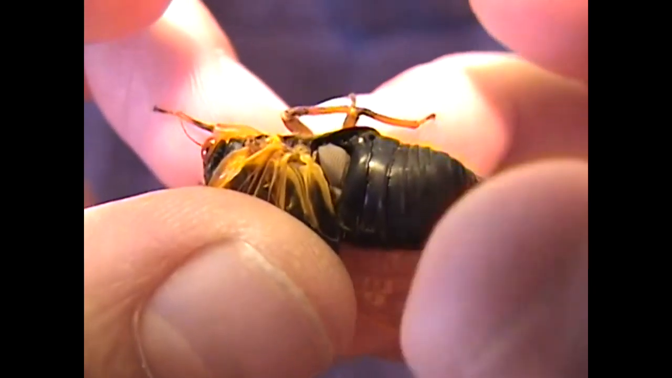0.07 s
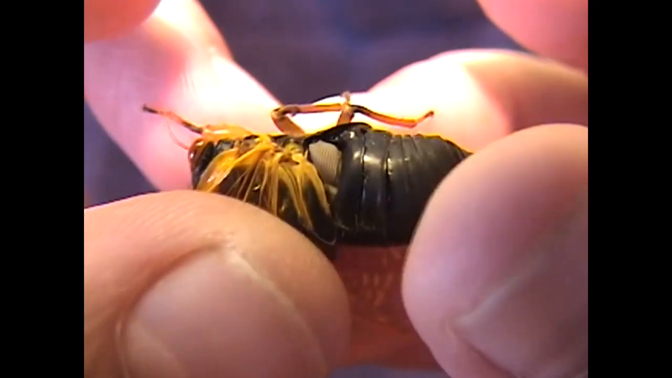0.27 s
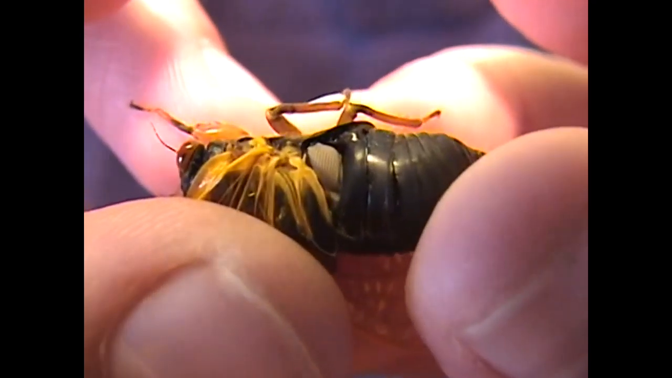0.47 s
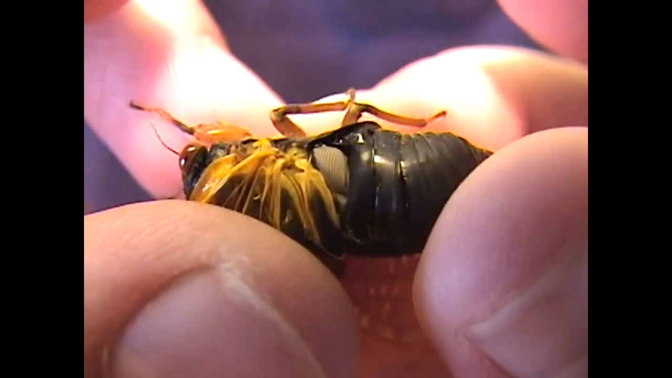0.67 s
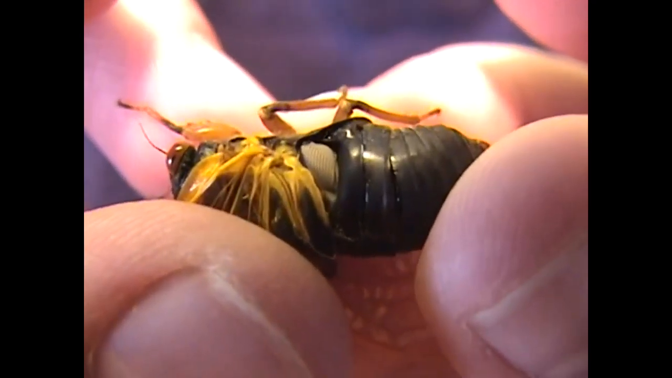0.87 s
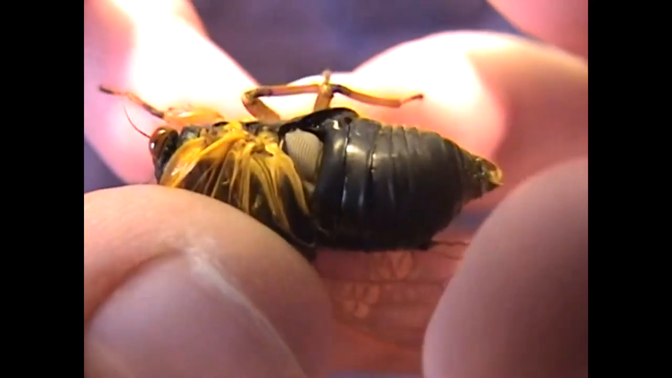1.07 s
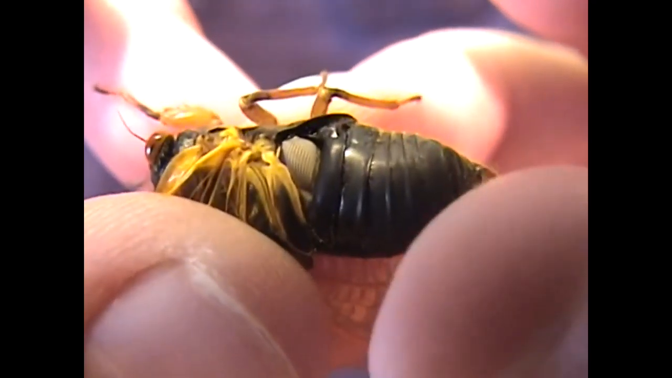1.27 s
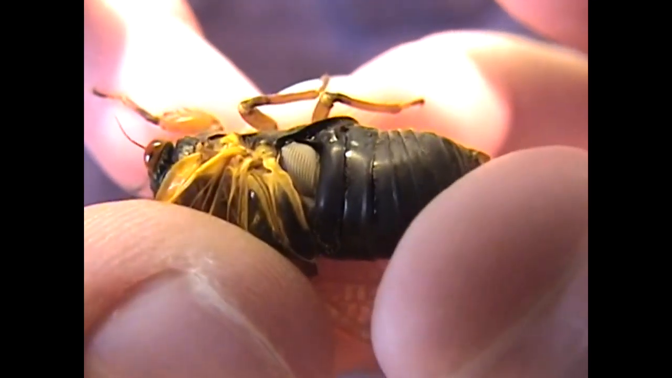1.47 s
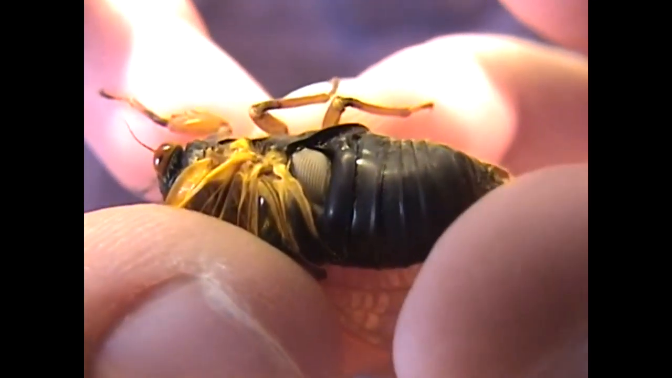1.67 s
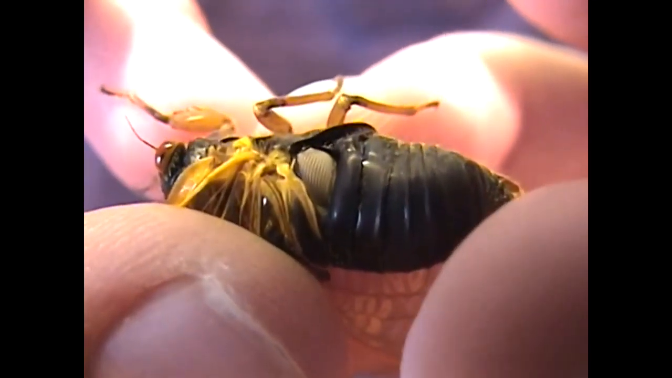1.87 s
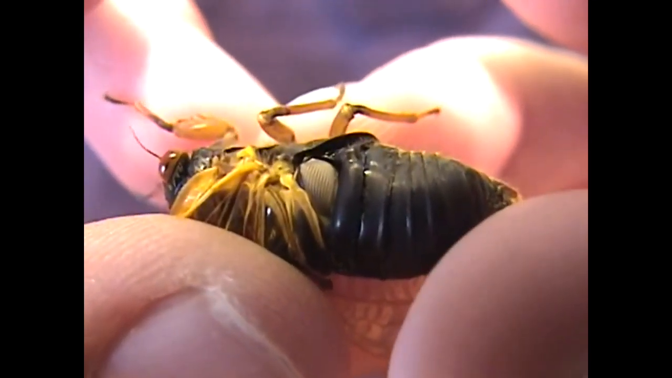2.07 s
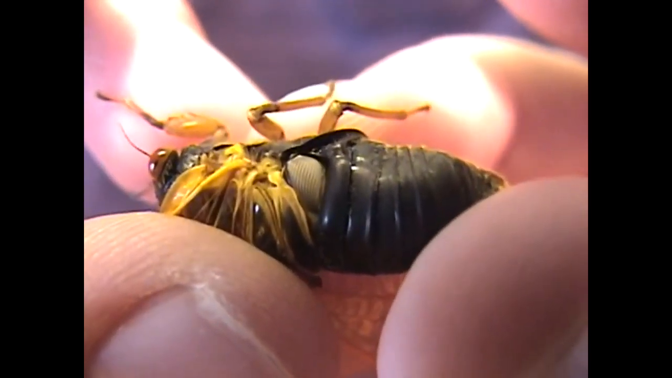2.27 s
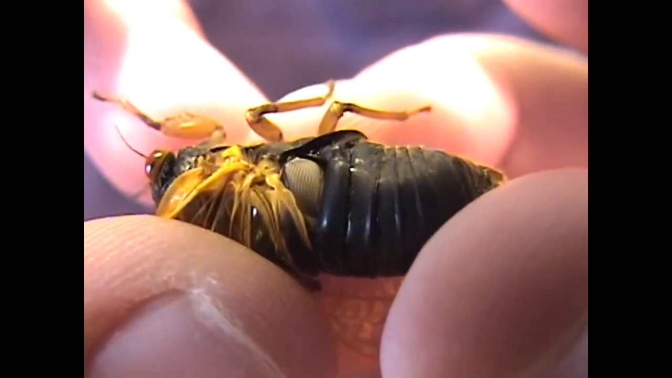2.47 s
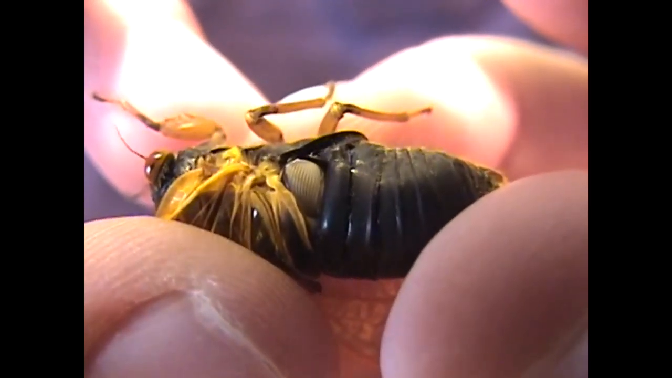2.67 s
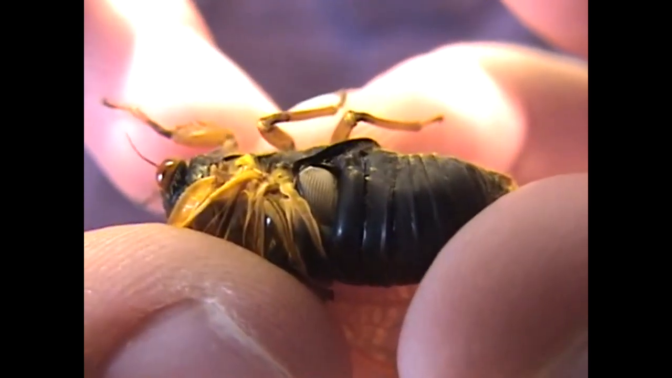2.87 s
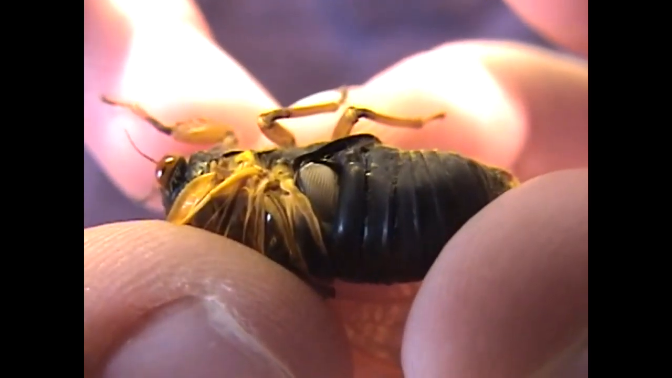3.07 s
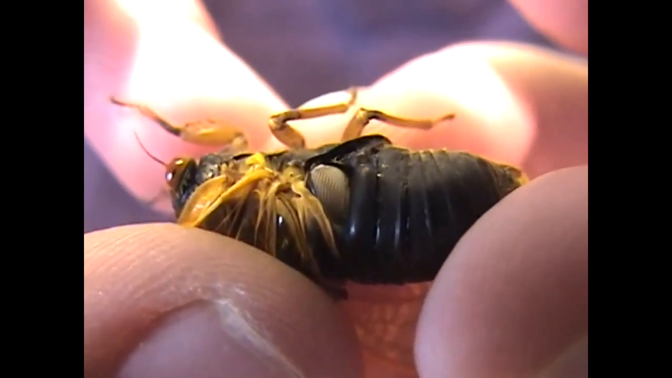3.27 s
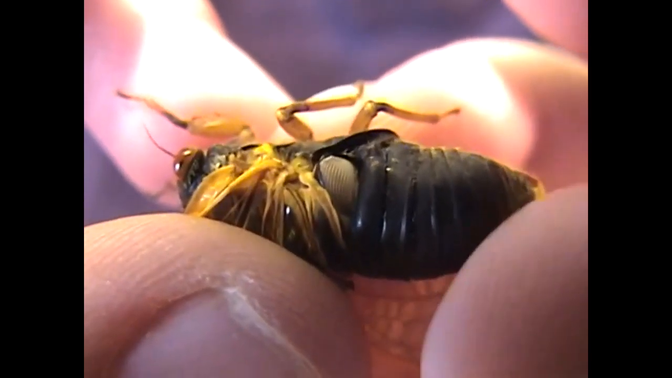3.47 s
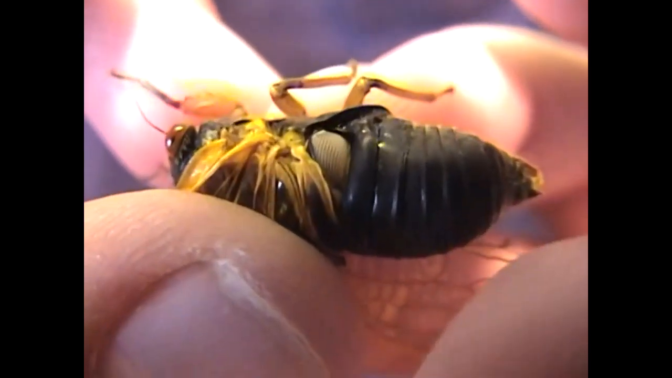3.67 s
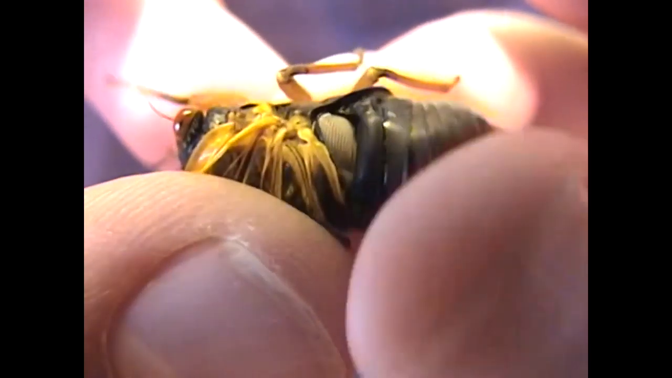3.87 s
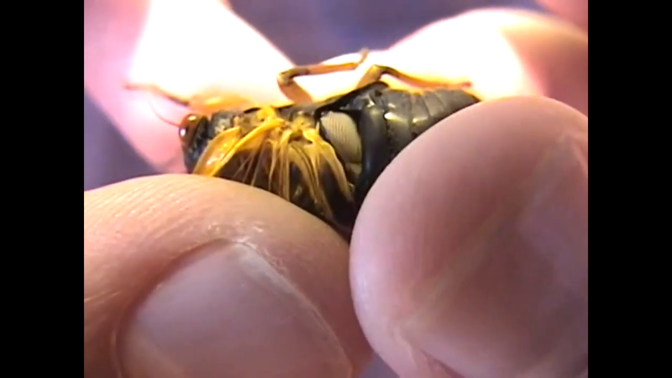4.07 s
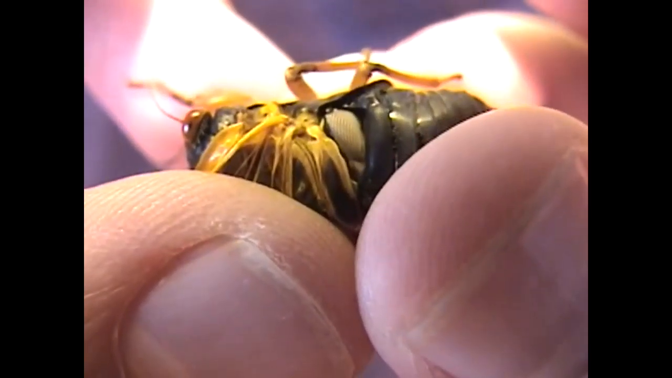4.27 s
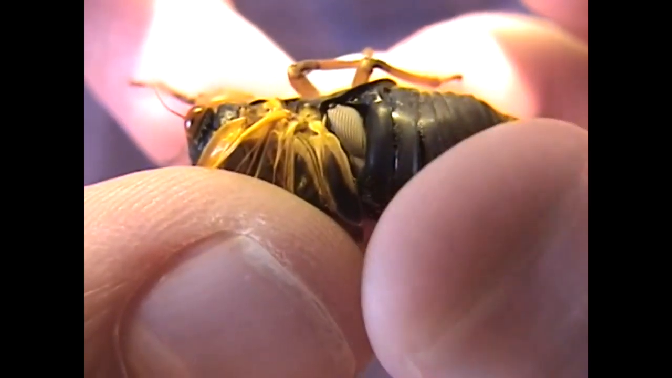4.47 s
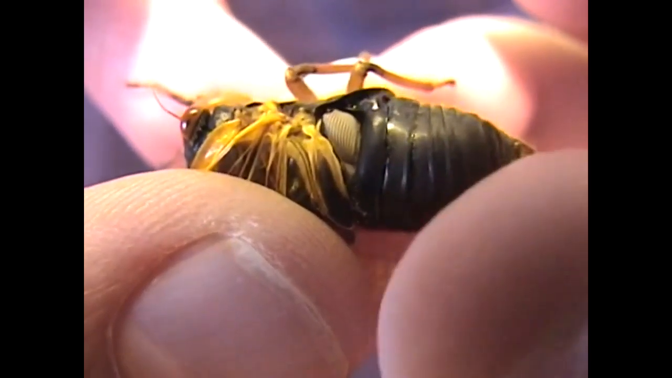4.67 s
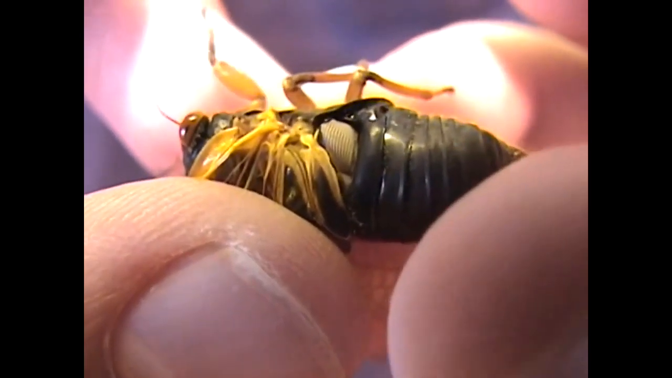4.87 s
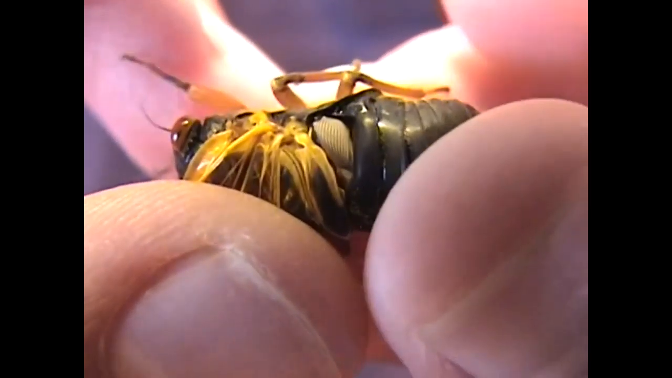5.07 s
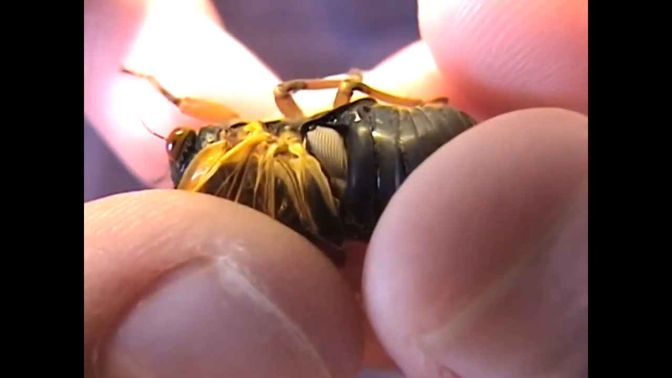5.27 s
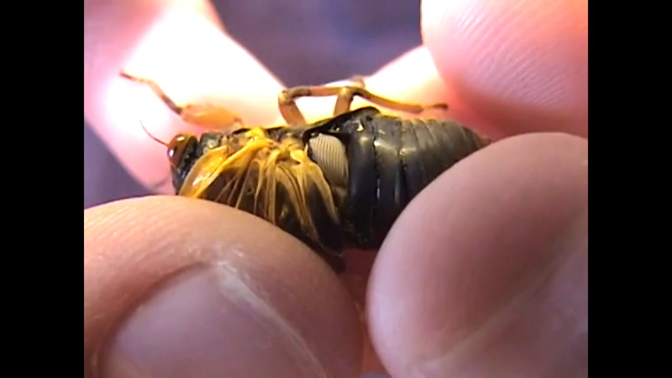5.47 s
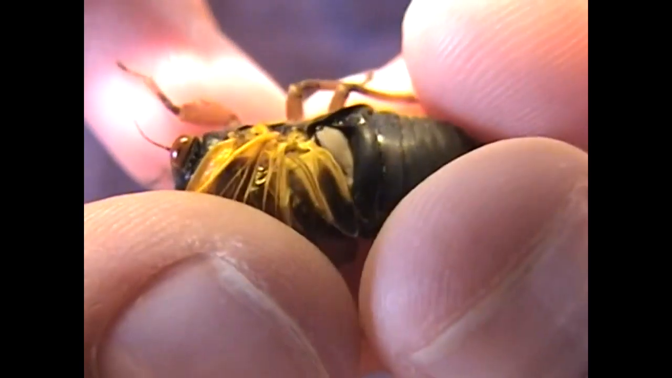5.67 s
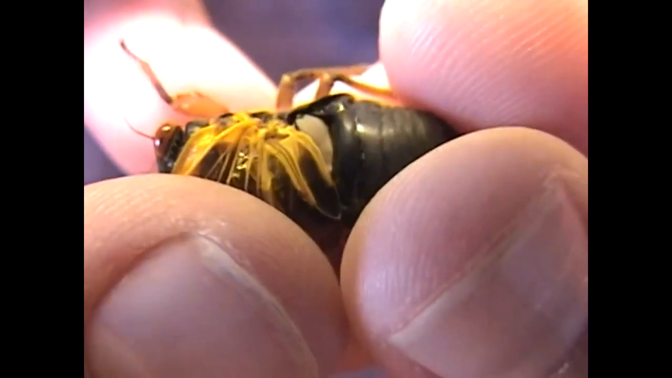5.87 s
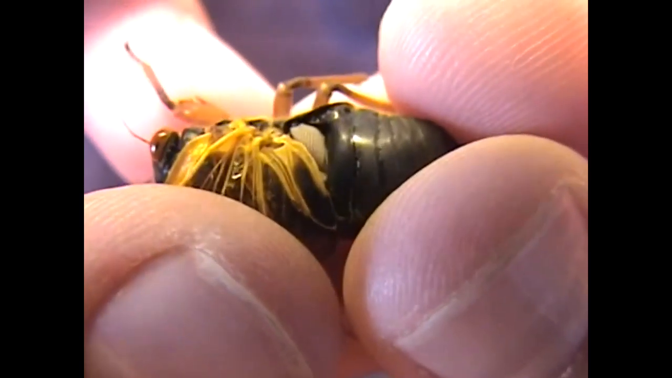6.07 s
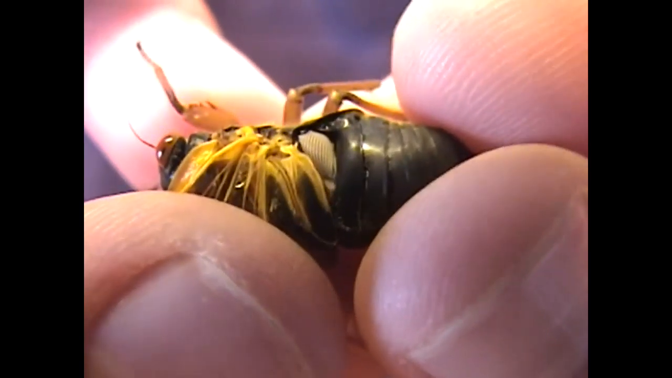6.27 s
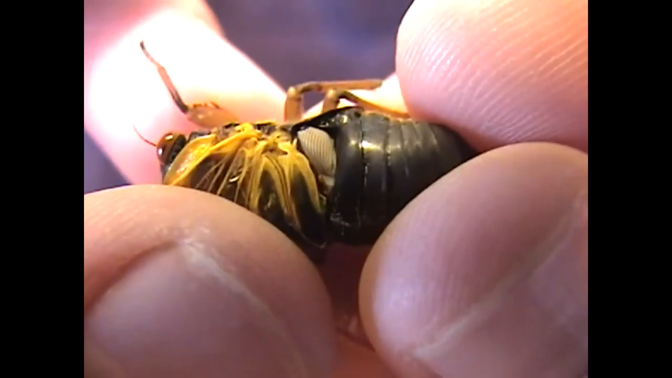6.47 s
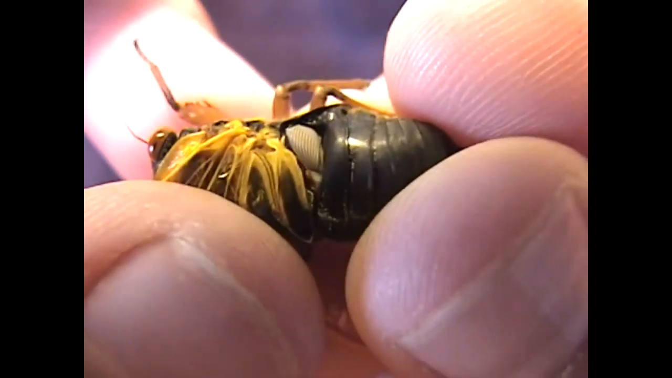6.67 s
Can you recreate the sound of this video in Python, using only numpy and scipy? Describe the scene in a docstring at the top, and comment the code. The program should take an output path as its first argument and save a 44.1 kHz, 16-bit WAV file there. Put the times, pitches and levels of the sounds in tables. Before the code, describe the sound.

Outdoors, a steady airy hiss of distant insects, bright around five to six kilohertz, sits slightly left over a quiet low drone and faint air hum. A cicada held in fingers is very close to the stereo microphone. A small tick opens, and a tiny two-pulse buzz comes at 0.44 s. A sharper double leg tick falls at 0.78 s, with fainter ticks and barely audible far whistles up to about 2.3 s. The hiss swells from 3.7 s. At 3.86 s the cicada bursts into harsh, dry, rapid rattling, about 170 pulses per second, broken into shortening pieces until 4.24 s. Brief rasps come at 4.94, 4.98 and 5.06 s. From 5.53 to 6.02 s a longer stuttering buzz runs with tiny gaps, then short chirrs at 6.21 and 6.4 s. Onsets snap, with slight low thumps; the hiss continues to the end at 6.7 s.

```python
"""Outdoors among trees, a cicada held between fingers close to a stereo microphone gives short alarm buzzes.
Its two ribbed membranes buckle in turn, rib after rib; each rib rings, drives the air sac and knocks the body.
Behind it, shaped noise makes a low drone and a high hiss of far choruses, over outdoor air and a faint hum.
Gliding near sines make a few far whistles, and short noise puffs make the ticks of legs and wings.
The recorder's gain control ducks loud sound and thumps at loud starts."""
import sys
import numpy as np
from scipy import signal
from scipy.fft import rfft, irfft, next_fast_len
from scipy.io import wavfile
from scipy.ndimage import uniform_filter1d, minimum_filter1d

SR = 44100
rng = np.random.default_rng(int(sys.argv[2]) if len(sys.argv) > 2 else 0)


def store_pcm(level_fs):
    """Save levels as 16-bit WAV."""
    pcm = np.round(np.clip(level_fs, -1, 1) * 32767).astype(np.int16)
    wavfile.write(sys.argv[1], SR, np.atleast_2d(pcm).T)


N = 297234      # length in samples


def from_db(db):
    """Turn decibels into a plain multiplier."""
    return 10 ** (np.asarray(db) / 20)


def rms_one(x):
    """Scale a signal to an average (rms) strength of 1."""
    return x / np.sqrt(np.mean(x ** 2) + 1e-20)


def sides(pan_db):
    """Left and right gains for a left-minus-right level difference."""
    return from_db(np.array([pan_db / 2, -pan_db / 2]))


def drift(rate_hz):
    """Slow random wander with an rms of about 1: smoothed noise made at every 40th sample, then joined up."""
    r = np.exp(-80 * np.pi * rate_hz / SR)
    raw = rng.standard_normal(N // 40 + 2002)
    slow = signal.lfilter([1], [1, -2 * r, r * r], raw)[2000:]      # drop the filter's start-up
    return np.interp(np.arange(N) / 40, np.arange(len(slow)), rms_one(slow))


def resonance(x, hz, width_hz):
    """Ring like a bell at one pitch: a two-pole peak with gain about 1 on top."""
    r = np.exp(-np.pi * width_hz / SR)
    feedback = [1, -2 * r * np.cos(2 * np.pi * hz / SR), r * r]
    return signal.lfilter([(1 - r * r) / 2, 0, (r * r - 1) / 2], feedback, x)


def band(x, low_hz, high_hz, order=2):
    """Keep only the sound between two frequencies."""
    return signal.sosfilt(signal.butter(order, [low_hz, high_hz], "band", fs=SR, output="sos"), x)


def noise(spectrum, alike, flicker_db):
    """Stereo noise of a given spectrum and left-right likeness; rms 1 in the mean of the sides, then flickering."""
    hz, level_db = np.transpose(spectrum)
    size = next_fast_len(N)
    grid = np.arange(size // 2 + 1) * SR / size + 1
    shape = from_db(np.interp(np.log(grid), np.log(hz), level_db, left=-90, right=-90))
    mid, side = irfft(rfft(rng.standard_normal((2, size))) * shape, size)[:, :N]
    alike = np.clip(alike, 0, 1)
    both = np.sqrt(1 + alike) * mid + np.sqrt(1 - alike) * side * [[1], [-1]]
    return both / np.std(both.mean(axis=0)) * from_db(flicker_db * drift(15.3))


# colour of the low outdoor air noise: f/Hz, relative level per Hz/dB
AIR_COLOUR = [(15, -42), (25, -6.5), (172, 0), (210, -6), (234, -0.5), (295, -6), (361, -3), (415, -6),
              (734, -7), (1000, -3.5), (1300, -54), (2200, -120)]
# faint low hum: f/Hz, width/Hz, level/dB
HUM_TONES = [(227, 4.5, -70), (270.3, 21, -65.5)]
AIR_DB, MIDS_DB = -57, -59


def outdoor_air():
    """Low air noise, smooth noise between the choruses, and a hum of noise rung by narrow resonances."""
    air = from_db(AIR_DB) * noise(AIR_COLOUR, alike=0.46, flicker_db=0.77)
    mids_colour = [(900, -24.0), (1800, -8.0), (3200, -2.5)]      # f/Hz, relative level per Hz/dB
    mids = from_db(MIDS_DB) * noise(mids_colour, alike=0.76, flicker_db=2.0)
    hum = 0
    for hz, width_hz, level_db in HUM_TONES:
        hum = hum + from_db(level_db) * rms_one(resonance(rng.standard_normal(N), hz, width_hz))
    return air + mids + hum


# strength of the two far choruses over time: t/s, drone level/dB, hiss level/dB
CHORUS_LEVELS = [(0, -46.5, -35.5), (.35, -48, -36.5), (.7, -46, -37.5), (1.0, -46, -37.5),
                 (1.3, -42, -38.5), (1.8, -45, -38.5), (2.5, -44.5, -37), (3.4, -45, -36),
                 (3.7, -45, -34.5), (3.85, -43.5, -31.5), (4.2, -45, -30), (4.55, -45.5, -35),
                 (5.2, -44, -36.5), (5.5, -42, -36.5), (6.74, -41.5, -38)]
# colour of the low drone: f/Hz, relative level per Hz/dB
DRONE_COLOUR = [(470, -25), (800, -25), (864, -15), (984, -20), (1140, -6), (1290, 4), (1360, 4),
                (1450, -7), (1630, -17.5), (2000, -32), (2600, -48), (4400, -120)]
# colour of the high hiss: f/Hz, relative level per Hz/dB
HISS_COLOUR = [(1530, -36), (2600, -34), (3460, -14), (4260, -3), (4750, -3.5), (5940, 3.5), (6620, -2),
               (7550, -12.5), (8550, -18.5), (10100, -28.5), (14600, -37.5), (15900, -54), (16500, -61)]
# the louder the hiss, the less it leans left: lean (dB) at the reference level (dB), extra lean per dB below it
HISS_PAN_DB, HISS_REFERENCE_DB, HISS_PAN_PER_DB = 2.5, -28.5, 0.21


def far_choruses():
    """Countless far calls blur into noise: a low drone and a high hiss, both leaning left."""
    times, drone_points, hiss_points = np.transpose(CHORUS_LEVELS)
    t = np.arange(N) / SR
    drone_db = np.interp(t, times, drone_points)
    hiss_db = np.interp(t, times, hiss_points)
    hiss_pan_db = HISS_PAN_DB + HISS_PAN_PER_DB * (HISS_REFERENCE_DB - hiss_db)
    drone = from_db(drone_db) * sides(6.0)[:, None] * noise(DRONE_COLOUR, alike=0.38, flicker_db=0.48)
    hiss = from_db(hiss_db) * sides(hiss_pan_db) * noise(HISS_COLOUR, alike=0.39, flicker_db=0.75)
    return drone + hiss


# faint far whistles: t/s, length/s, first f/Hz, last f/Hz, arch height f/Hz, level at mid-whistle/dB before wavering
FAR_WHISTLES = [(0.647, 0.13, 2260, 2300, 10, -63), (1.535, 0.25, 2900, 2950, -8, -60),
                (1.581, 0.332, 907, 840, -25, -59), (2.183, .1, 2840, 2400, 680, -51)]
WHISTLE_EDGE_DB = -2     # level at both ends, against the middle


def whistles():
    """Near sines that glide in an arch, swell, fade and waver in strength, far away."""
    out, t = np.zeros(N), np.arange(N) / SR
    for start, length_s, first_hz, last_hz, arch_hz, level_db in FAR_WHISTLES:
        along = np.clip((t - start) / length_s, 0, 1)
        arch = np.sin(np.pi * along)
        swell_db = WHISTLE_EDGE_DB * (1 - arch)
        gain = (arch > 1e-9) * from_db(level_db + swell_db + 2.8 * drift(40))      # silent outside the whistle
        pitch_hz = first_hz + (last_hz - first_hz) * along + arch_hz * arch
        out += gain * np.sin(2 * np.pi * np.cumsum(pitch_hz) / SR)
    return out


# ticks of legs and wings: t/s, level before filtering/dB
LEG_TICKS = [(0.014, -23.5), (0.1366, -32), (0.2508, -33), (0.3825, -31), (0.7832, -17), (0.789, -23),
             (0.9098, -39), (0.962, -28.5), (1.3556, -34), (1.9714, -34), (2.1071, -33), (2.5681, -35),
             (4.545, -28), (6.6753, -36)]
TICK_LOW_DB, TICK_PAN_DB = -9.5, -0.5     # duller part against the bright part; left minus right


def ticks():
    """Each tick is a few milliseconds of bright noise with a duller knock under it."""
    bright, dull = np.full((2, 2, N + 800), 1e-18)
    fade = np.exp(-np.arange(800) / (0.0016 * SR))      # dies away with a 1.6 ms time constant
    pan = sides(TICK_PAN_DB)[:, None]
    for start, level_db in LEG_TICKS:
        at = round(start * SR)
        middle, spread = rng.standard_normal((2, 800)) * fade
        bright[:, at:at + 800] += from_db(level_db) * pan * (middle + 0.93 * spread * [[1], [-1]])
        dull[:, at:at + 800] += from_db(level_db + TICK_LOW_DB) * pan * middle
    knock = 1.05 * band(dull, 850, 4700) + 2.3 * band(dull, 310, 780)
    return (0.65 * band(bright, 7500, 13400) + knock)[:, :N]


def nearby_echoes(x, t60_ms=110.0):
    """Hands, body and walls close by return a short dense scatter, different on each side."""
    t = np.arange(2200) / SR
    fade = from_db(-60000 * t / t60_ms) * (t > .001)      # nothing returns in the first millisecond
    scatter = rng.standard_normal((2, 2200)) * fade
    scatter = scatter / np.sqrt(np.sum(scatter ** 2, axis=1, keepdims=True))
    return signal.fftconvolve(x, scatter, axes=1)[:, :N]


def struck(modes, knocks):
    """Knocks ring each resonance, applied twice so that it falls away steeply on both sides."""
    total = 0
    for hz, width_hz, left_db, right_db, sign in modes:
        once = resonance(knocks, hz, 1.42 * width_hz)      # two passes narrow the peak, so each is wider
        twice = resonance(once, hz, 1.42 * width_hz)
        total = total + from_db([[left_db], [right_db]]) * [[1], [sign]] * twice
    return total


# buzzes: t/s, length/ms, stroke period/ms, relative rib ring level/dB, relative body knock level/dB,
# low mode pitch against the rib's main pitch (ratio), left minus right level/dB
ALARM_BUZZES = [(0.438, 11.8, 5.9, -17, -28, 0.83, 3.5), (3.8593, 78.4, 5.7, -19.5, -29, 0.7, 1),
                (3.951, 76.7, 5.65, -18.5, -28.5, 0.72, 0), (4.0364, 38.4, 6.4, -21, -27.5, 0.704, 0.5),
                (4.091, 36, 5.3, -21, -29.5, 0.7, 0.5), (4.1531, 29.5, 5.9, -20, -26, 0.725, 1.5),
                (4.2361, 6.1, 6.1, -17, -33.5, 0.77, 1), (4.9355, 27.8, 5.8, -15.5, -28, 0.8, 2.2),
                (4.9776, 25.6, 6.4, -15.5, -27.5, 0.84, 0.5), (5.0643, 19.5, 6.5, -17.5, -25.5, 0.77, 3.5),
                (5.535, 64.5, 5.6, -17.5, -27.5, 0.88, 1.7), (5.63, 24.4, 5.8, -21.5, -27.5, 0.94, 3.5),
                (5.675, 111, 5.7, -17.5, -28, 0.863, 0.5), (5.8033, 75, 5.77, -19, -26, 0.77, 1),
                (5.895, 127.4, 6.3, -19.5, -26, 0.78, 0), (6.209, 13.6, 7.3, -17, -25, 0.86, 2.5),
                (6.399, 27.2, 6.8, -18.5, -26.5, 0.88, 4.3), (6.438, 26.8, 6.7, -22, -26, 0.85, 0.5)]
# ribs in the order they buckle: delay/ms at a 5.8 ms stroke, f/Hz, relative level/dB, time to fall 60 dB/ms
MEMBRANE_RIBS = [(0, 6400, 3.5, 6), (.75, 5950, 2.5, 6), (1.5, 5550, 1.5, 6.5), (2.3, 5200, -.5, 7),
                 (3.2, 4900, -1.5, 7), (4.2, 4600, -3.5, 6.5)]
LOW_MODE_DB = -13     # the ribs' low mode has the same base level in every buzz
SAC_DB, SAC_RATIO, SAC_DB_PER_RATIO = 7, 0.6995, -180     # the sac rings most when the low mode sits low


def buckling_ribs(timing_ms=.28, rib_ms=.07, pitch_spread=0.019, strength_db=1.27, twin_pitch=0.024,
                  twin_pan_db=-0.7, twin_treble_db=-2.5, rise_ms=0.16, first_db=1.5):
    """Every stroke buckles the ribs in order, mostly falling in pitch; slower strokes spread them out."""
    ringing, into_sac, knocks, snaps = np.full((4, 2, N + 900), 1e-18)
    t = np.arange(700) / SR
    rise = 1 - np.exp(-1000 * t / rise_ms)
    for start, length_ms, period_ms, level_db, knock_db, low_ratio, pan_db in ALARM_BUZZES:
        chance = rng.standard_normal((24, len(MEMBRANE_RIBS), 6))      # small luck for each stroke and rib
        sac_db = SAC_DB + SAC_DB_PER_RATIO * (low_ratio - SAC_RATIO)
        snaps[:, round(start * SR)] += from_db(level_db + 6.5)      # the first buckling of a buzz snaps hardest
        for k in range(round(length_ms / period_ms)):
            twin = (-1) ** k      # the two membranes take turns; they differ in pitch, side and treble
            begins = start + (k * period_ms + (k > 0) * timing_ms * chance[k, 0, 0]) / 1000
            for (delay_ms, hz, rib_db, t60_ms), luck in zip(MEMBRANE_RIBS, chance[k]):
                wait_ms = delay_ms * period_ms / 5.8 + (delay_ms > 0) * rib_ms * luck[1]
                at = round((begins + wait_ms / 1000) * SR)
                pitch = hz * (1 + twin_pitch * twin + pitch_spread * luck[2])
                upper = from_db(level_db + 7) * np.sin(2 * np.pi * pitch * t)
                lower_gain = from_db(LOW_MODE_DB + strength_db * luck[3])
                lower = lower_gain * np.sin(2 * np.pi * low_ratio * pitch * t)
                start_db = rib_db + first_db * (k == 0) + strength_db * luck[4]
                dying = rise * from_db(start_db - 60000 * t / t60_ms)
                rib = sides(pan_db + twin_pan_db * twin)[:, None] * dying * (upper + lower)
                ringing[:, at:at + 700] += rib
                into_sac[:, at:at + 700] += from_db(sac_db) * rib
                uneven_db = strength_db * (luck[5] + 0.51 * luck[[1, 2]])      # a little different left and right
                knocks[:, at] += from_db(knock_db + twin_treble_db * twin + uneven_db)
    return ringing, into_sac, knocks, snaps


# body resonances struck by every rib: f/Hz, width/Hz, relative left level/dB, relative right level/dB, right sign
BODY_MODES = [(8765, 500, 7.5, 15.5, 0.93), (8900, 240, -33, -10, 0.1), (6430, 1640, 13, 10, 0.54)]
# weak high resonances: f/Hz, width/Hz, relative left level/dB, relative right level/dB, right sign
HIGH_MODES = [(12100, 1630, -7, -4.5, 0.74), (13600, 810, -36, -13, 0.69)]
SAC_HZ, SAC_WIDTH_HZ = 4970, 340     # the hollow abdomen rings on after each rib


def cicada():
    """The ribs sound directly, through the hollow abdomen and through the knocked body, with close echoes."""
    ringing, into_sac, knocks, snaps = buckling_ribs()
    sac = resonance(into_sac, SAC_HZ, SAC_WIDTH_HZ)
    body = ringing + sac + from_db(18.5) * struck(BODY_MODES, knocks)
    # so small a body radiates in one band only
    edges = signal.cheby1(4, .5, [3250, 9800], "band", fs=SR, output="sos")
    thin = from_db(4.0) * band(knocks, 940, 2900) + band(snaps, 430, 7800, order=1)
    scattered = knocks * rng.choice([-1, 1], knocks.shape)      # short waves reach the sides in unrelated phase
    high = from_db(19.0) * struck(HIGH_MODES, scattered)
    near = (signal.sosfilt(edges, body) + thin + high)[:, :N]
    return near + from_db(-16.5) * nearby_echoes(near)


def scene():
    """Add the background, the whistles, the ticks and the cicada."""
    return outdoor_air() + far_choruses() + whistles() + ticks() + cicada()


# standing bias ahead of the gain stage: left, right [amplitude, full scale = 1]
STANDING_BIAS = [-0.03, -0.19]
CUTOFF_HZ = 16400     # the recorder passes almost nothing above this


def record(dry, knee_db=-18.5, slope=0.12, release_db_per_s=24.0, attack_ms=0.1, block_hz=8.8):
    """Gain control ducks loud sound and with it a standing bias; the blocking filter makes that step a thump."""
    level_db = 20 * np.log10(uniform_filter1d(np.abs(dry).max(axis=0), size=30) + 1e-6)
    level_db = -minimum_filter1d(-level_db, size=301, origin=150)      # peaks are held for 7 ms
    fall = release_db_per_s * np.arange(N) / SR
    over_db = slope * np.maximum(level_db - knee_db, 0)
    held_db = np.maximum.accumulate(over_db + fall) - fall      # quick to duck, slow to let go
    r = np.exp(-1000 / (attack_ms * SR))
    gain = from_db(-signal.lfilter([1 - r], [1, -r], held_db))
    bias = np.c_[STANDING_BIAS]
    biased = gain * (dry + bias) - bias      # taking the resting bias off avoids a step at the start
    blocked = signal.sosfilt(signal.butter(2, block_hz, "high", fs=SR, output="sos"), biased)
    return signal.sosfilt(signal.ellip(10, .5, 70, CUTOFF_HZ, fs=SR, output="sos"), blocked)


dry = scene()
out = record(dry)
store_pcm(out)
```